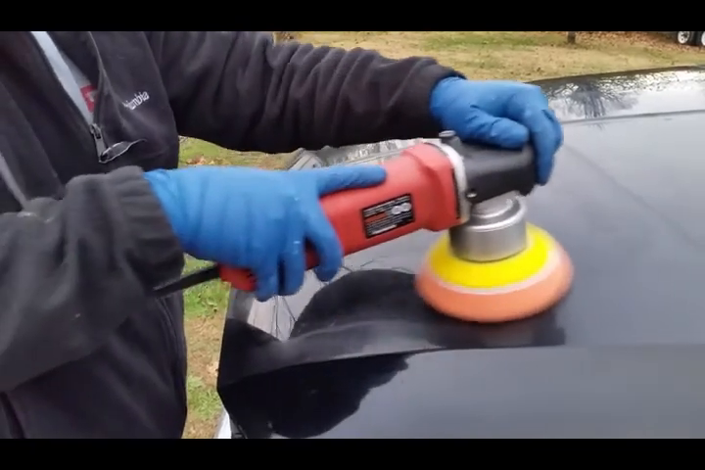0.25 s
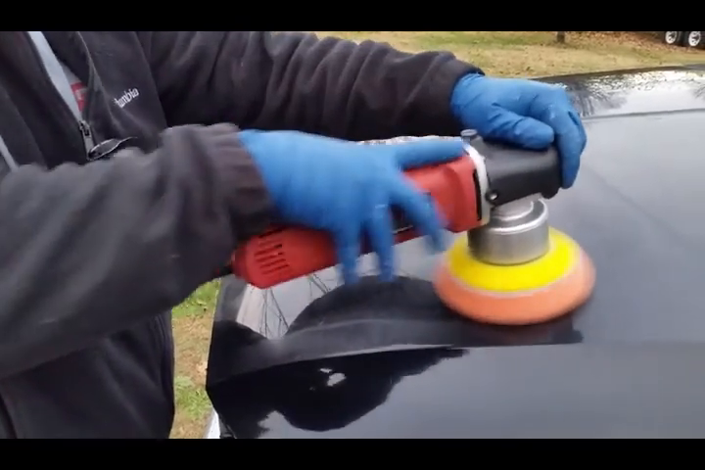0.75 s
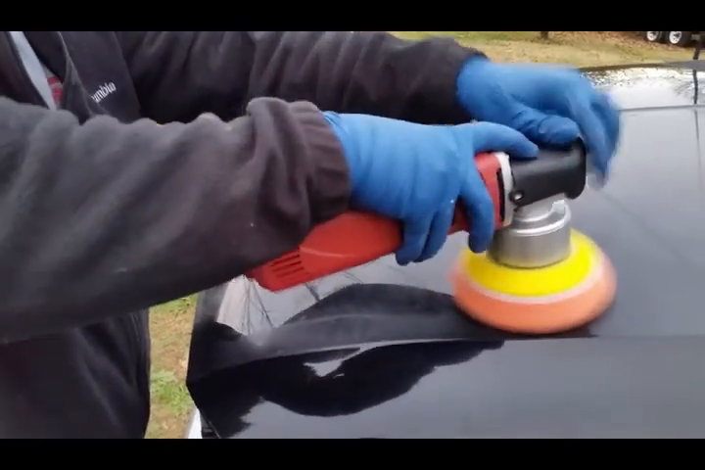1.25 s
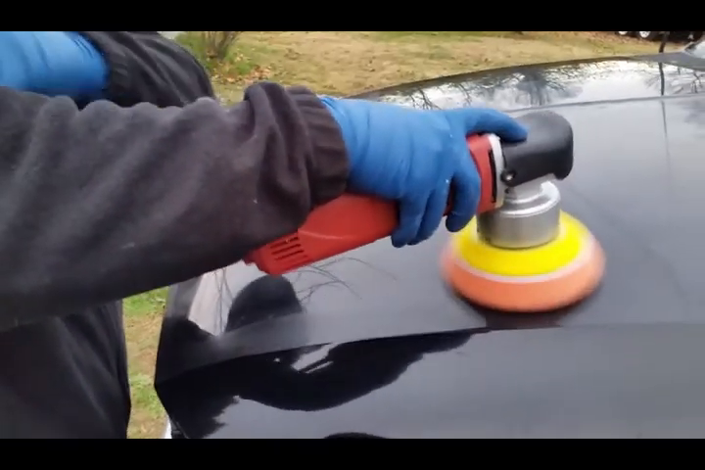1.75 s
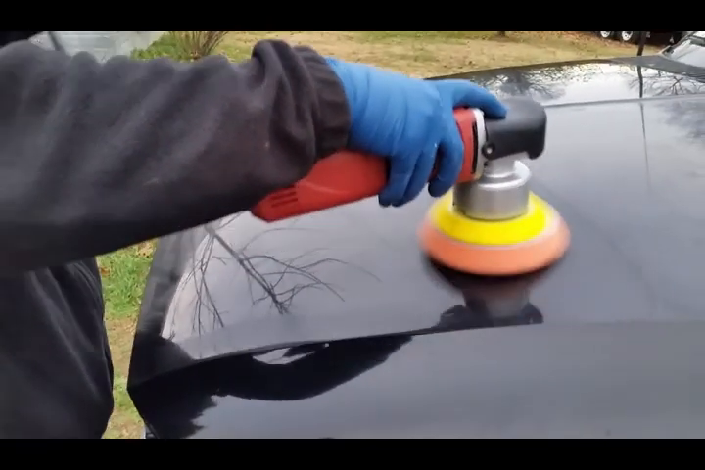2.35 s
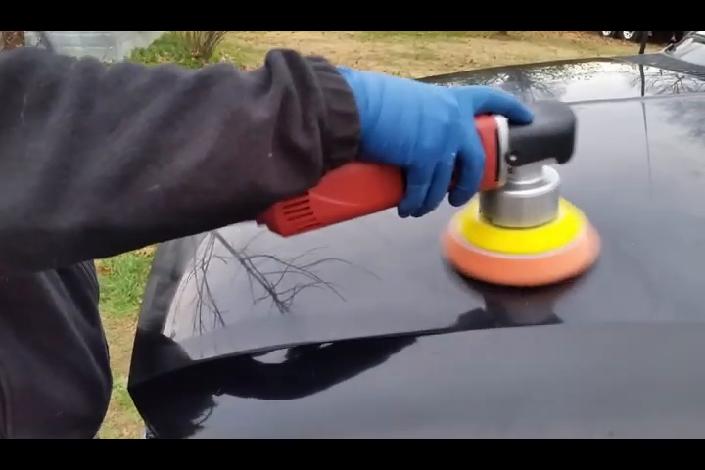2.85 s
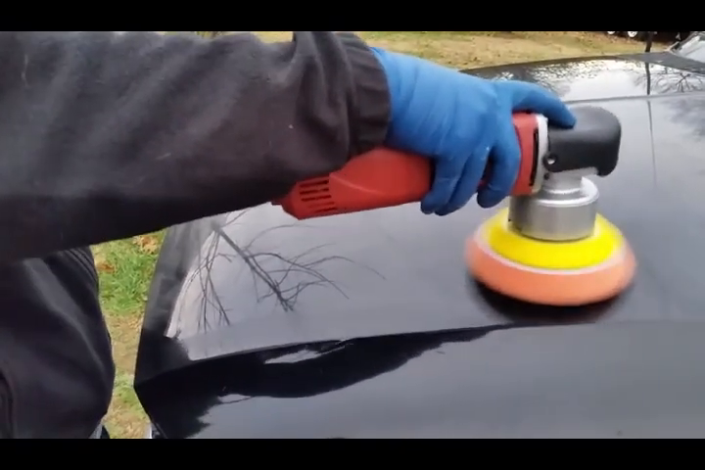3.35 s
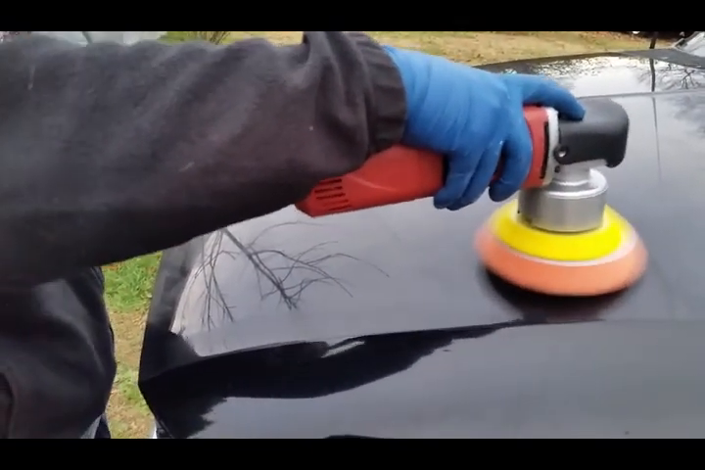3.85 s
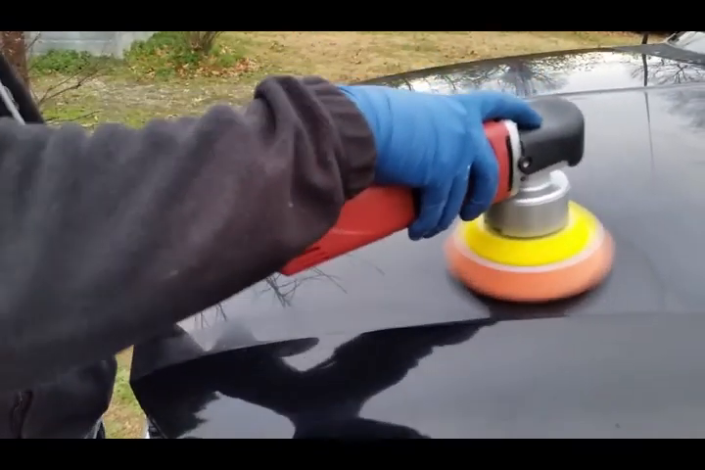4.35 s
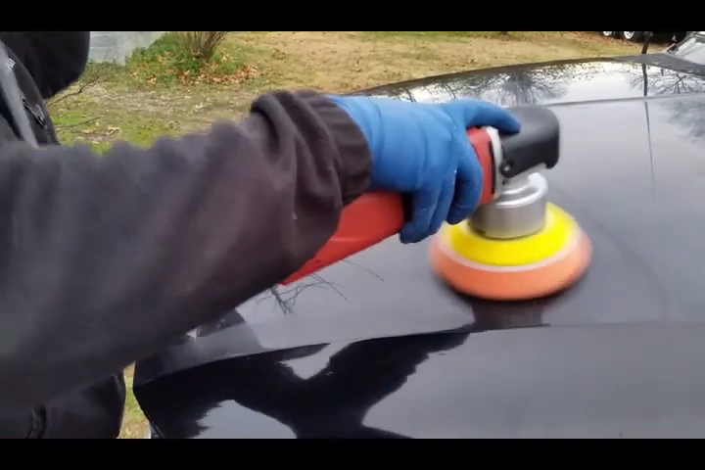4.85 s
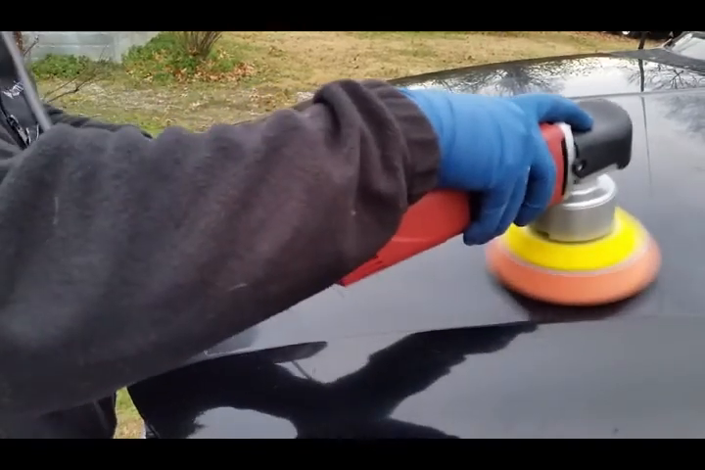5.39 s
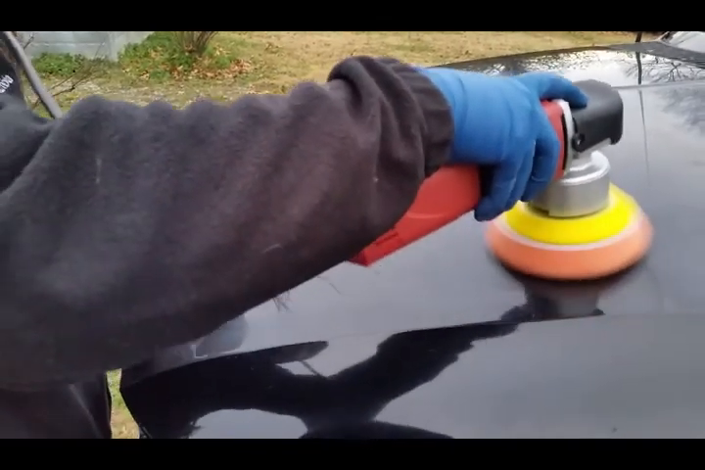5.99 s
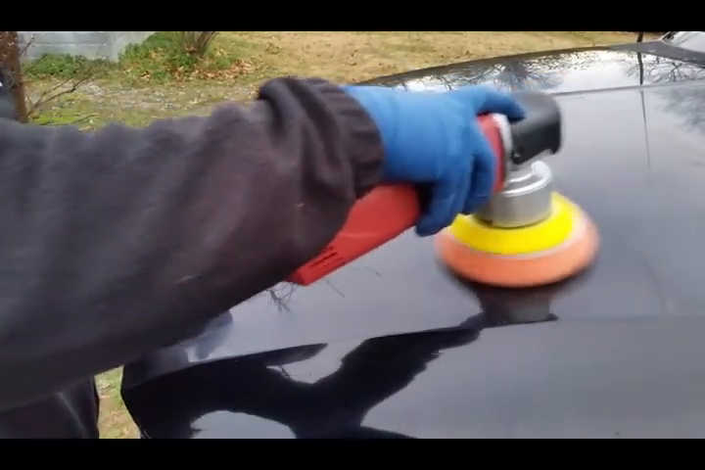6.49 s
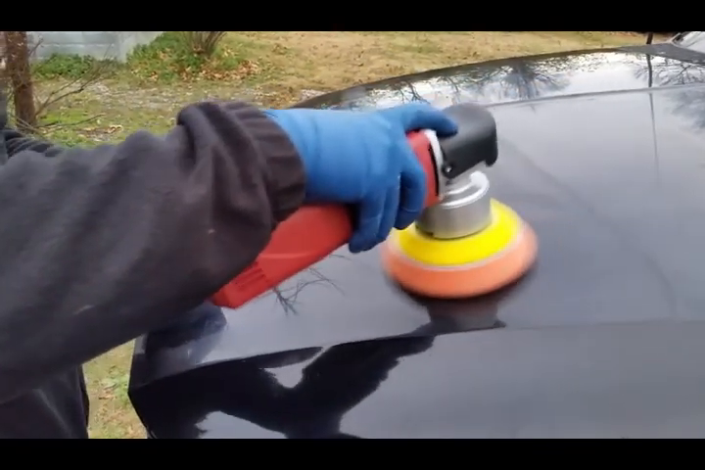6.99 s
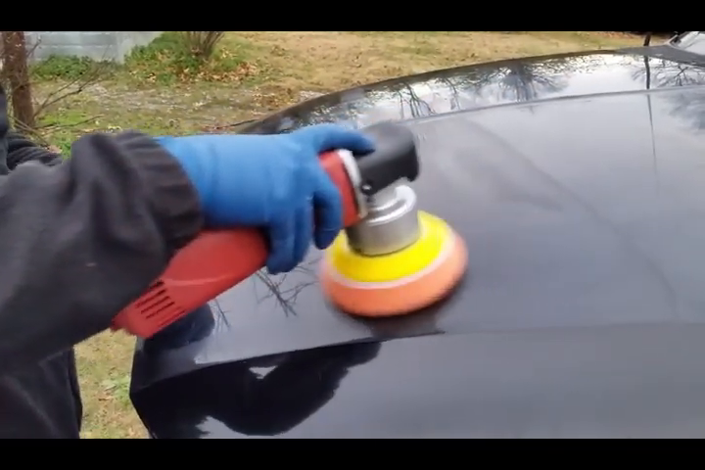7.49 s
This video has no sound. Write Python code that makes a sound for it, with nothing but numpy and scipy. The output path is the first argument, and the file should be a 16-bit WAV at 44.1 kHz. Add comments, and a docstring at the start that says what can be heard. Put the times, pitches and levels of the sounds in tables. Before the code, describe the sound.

Outdoors, very close in stereo, an electric orbital polisher runs without stopping on a car bonnet. A deep droning hum sits under a bright fan hiss, raspy gearbox and thin motor whine. The hum starts lighter, swells as the panel booms, eases, then wobbles quickly with a few short buzzing skips before settling into a clearer whine. Soft foam swishing runs throughout.

```python
"""Outdoors, close to a stereo microphone, a dual-action polisher runs on a car bonnet.
Forced vibration: the pad orbits about 92 times a second and drums on the panel; its slow free spin makes
the hum throb. The foam swishes on the paint, and later the pad's edge skips in short buzzes.
Gear meshing at 46:13 adds a whine and a rasp; the motor adds thin lines and the hiss of its cooling fan."""
import sys
import numpy as np
from scipy import signal
from scipy.fft import rfft, irfft, next_fast_len
from scipy.io import wavfile
from scipy.ndimage import uniform_filter1d, map_coordinates

SR = 44100
rng = np.random.default_rng(int(sys.argv[2]) if len(sys.argv) > 2 else 0)


def wav_out(sig):
    """Save sig, one row per channel (or a flat mono array), as 16-bit PCM at SR to the path in sys.argv[1]."""
    wavfile.write(sys.argv[1], SR, np.round(np.clip(np.atleast_2d(sig).T, -1, 1) * 32767).astype(np.int16))


N = 340893
PINION, RING = 13, 46  # gear teeth


def amp(db):
    """Logarithmic level: decibels to amplitude gain."""
    return 10 ** (np.asarray(db) / 20)


def unit(x):
    """Power normalisation: scale to rms 1."""
    return x / np.sqrt(np.mean(np.abs(x) ** 2) + 1e-20)


def swing(db):
    """Level fluctuation: a level curve about its own mean."""
    return db - db.mean()


def along(rows, hz):
    """Spectral interpolation: each column after the frequency, read on a log axis."""
    f, *cols = np.transpose(rows)
    return np.array([np.interp(np.log(hz + 1), np.log(f + 1), c) for c in cols])


def curves(rows):
    """Temporal interpolation: one value per sample for each column after the time."""
    s, *cols = np.transpose(rows)
    return [np.interp(np.arange(N) / SR, s, c) for c in cols]


def spells(rows, rise_s, fall_s):
    """Linear envelopes: (start, end, strength) rows, at half strength at start and end."""
    t = np.arange(N) / SR
    total = 0
    for start, end, strength in rows:
        ramp = np.minimum((t - start) / rise_s, (end - t) / fall_s) + .5
        total = total + strength * np.clip(ramp, 0, 1)
    return total


def wobble(rate):
    """Random modulation: a curve through normal random knots, rate knots a second."""
    knots = rng.standard_normal(int(N * rate / SR) + 4)
    coarse = np.arange(0, N + 32, 32)
    smooth = map_coordinates(knots, [coarse * rate / SR], mode="nearest")
    return np.interp(np.arange(N), coarse, smooth)


def angle(rate):
    """Phase as integrated frequency: running angle of something that turns rate times a second."""
    return 2 * np.pi * np.cumsum(rate) / SR


# stereo coherence of the noises: (frequency [Hz], left-right likeness [0-1], phase by which left leads [rad])
PORT_COHERENCE = [(30, 0.9, 2), (101, 0.56, 0.5), (317, 0.8, 1), (770, 0.71, 0), (1780, 0.58, -2.5),
                  (2810, 0.66, -1.5), (3370, 0.58, -4), (5860, 0.77, -4.5), (8700, 0.02, -7),
                  (14500, 0, -2.5)]


def rush(colour, patchy_db=0):
    """Partial coherence: coloured stereo noise, partly shared by the ports, with a mid channel of rms 1."""
    size = next_fast_len(N + 8192)
    hz = np.fft.rfftfreq(size, 1 / SR)
    alike, lead = along(PORT_COHERENCE, hz)
    alike = np.clip(alike, 0, 1)
    a, b = rfft(rng.standard_normal((2, size)))
    right = alike * np.exp(-1j * lead) * a + np.sqrt(1 - alike ** 2) * b
    pair = np.array([a, right]) * amp(along(colour, hz))
    pair = irfft(pair, size)[:, :N]
    if patchy_db:  # narrow bands slowly come and go
        z = signal.stft(pair, nperseg=1024)[2]
        field = uniform_filter1d(rng.standard_normal(z.shape), size=6, axis=1)
        field = uniform_filter1d(field, size=20, axis=2)
        pair = signal.istft(z * amp(patchy_db * unit(field)), nperseg=1024)[1][:, :N]
    return pair / np.std(pair.mean(axis=0))


# mean orbital speed of the pad: (time [s], orbit rate [Hz])
ORBIT_RATE = [(0, 90.3), (1.35, 90.8), (1.85, 92.2), (3.85, 92.8), (4.93, 94.7), (5.7, 92.77), (6.2, 91.48),
              (7.73, 91.25)]
# free rotation of the pad: (time [s], spin rate [Hz], rocking [0-1])
PAD_SPIN = [(0, 9.26, 0.26), (.6, 9.9, 0.1), (2, 9.7, 0), (2.6, 9.5, 0), (2.85, 9.4, .2), (3.15, 9.5, 0),
            (3.9, 9.8, 0), (4.4, 12.2, 0.32), (5.05, 11, 0.2), (5.3, 10.2, 0.6), (5.7, 9.49, 0.73),
            (6.15, 8.93, 0.64), (6.6, 9.16, 0.68), (6.85, 8.85, 0.2), (7.1, 8.9, 0.1), (7.73, 12, 0.5)]


def motion(press_s=5.72):
    """Compound rotation: angles of orbit and spin (low edge presses at press_s), and rocking of the pad."""
    speed, = curves(ORBIT_RATE)
    spin_rate, rocking = curves(PAD_SPIN)
    spin = angle(spin_rate)
    spin -= np.interp(press_s, np.arange(N) / SR, spin)
    orbit = angle(speed * (1 + 0.000457 * wobble(14)))
    return orbit, spin, rocking


# the pad leans on its edge: (start [s], end [s], strength [0-1])
EDGE_LEANS = [(5.12, 6.43, 0.13), (5.86, 6.43, 0.59)]


def edge_leaning():
    """Contact pressure: how strongly the pad leans on its edge."""
    return spells(EDGE_LEANS, rise_s=0.3, fall_s=0.052)


# the pad crosses a springy stretch and the panel booms:
# (start [s], end [s], lift [dB], centre frequency [Hz], width [octaves])
PANEL_BOOMS = [(0, 0.39, 12, 365, 0.22), (1.503, 2.284, 4, 367, 0.13), (2.277, 2.61, 6, 273, 0.16),
               (2.3, 2.723, 11, 530, 1.8), (2.665, 3.097, 12.5, 275, 0.15), (3.118, 4.126, 9.5, 475.4, 1.6),
               (3.37, 4.233, 7, 289, 0.42), (4.13, 4.453, 5.5, 366, 0.15), (5.1, 5.8, 2.5, 370, 0.17),
               (6.95, 7.49, 10.5, 275, 0.28)]


def booming(hz):
    """Panel resonance: decibels by which the springy stretches lift a line at hz."""
    lifts = []
    for start, end, db, centre, width in PANEL_BOOMS:
        octaves = np.log2(hz / centre)
        lifts.append((start, end, db * np.exp(-(octaves / width) ** 2)))
    return spells(lifts, rise_s=0.25, fall_s=0.24)


# level difference of the hum at the two ports: (frequency [Hz], left minus right [dB])
HUM_BALANCE = [(92, 3.5), (185, 5.5), (277, 8), (370, 8.5), (460, 9.5), (800, 4)]


def at_ports(line, order):
    """Interaural-type level difference: a line of the hum as the two ports hear it."""
    ratio = amp(along(HUM_BALANCE, order * 92)[0])  # nominal 92 Hz orbit
    return np.outer([ratio, 1], line) * 2 / (1 + ratio)


def harmonic(order, orbit, spin, rocking, swell, bend, lag, rough, flutter):
    """Amplitude and phase modulation: each turn of the rocking pad swells a line and bends its phase."""
    turn = spin - lag + .3 * wobble(9)
    rocking = rocking * amp(2 * wobble(11))
    bent_turn = turn + np.pi / 9 + 0.28 * wobble(5)
    throb = np.exp(rocking * (swell * np.cos(turn) + 1j * bend * np.cos(bent_turn)))
    throb += flutter * rocking * np.exp(-2j * turn)  # the pad is not quite round: flutter twice a turn
    power = uniform_filter1d(np.abs(throb) ** 2, SR // 5)
    throb /= np.sqrt(np.abs(power))  # evens the level over a fifth of a second
    grip = unit(1 + rough * (wobble(35) + 1j * wobble(35)))  # the foam grips unevenly
    stray = 0.6 * (order - 1) * wobble(1.489)  # slow phase drift, wider for higher lines
    line = -np.sqrt(2) * np.real(throb * grip * np.exp(1j * (order * orbit + stray)))
    return at_ports(line, order)


# how hard the pad drives the bonnet:
# (time [s], sway of the whole panel [dB], reference drumming under the pad [dB])
PANEL_DRIVE = [(0, -26, -38), (.4, -25, -31.5), (.9, -24.5, -28), (1.45, -20.5, -23.5), (2.25, -20, -21),
               (2.6, -21.5, -22.5), (2.82, -20.5, -25), (3.15, -21, -21), (3.9, -20, -23),
               (4.7, -18.5, -26), (5.05, -19, -25.5), (5.65, -19.5, -21), (6.1, -22, -21),
               (6.8, -19, -26.5), (7.25, -19, -22.5), (7.48, -23, -31.5), (7.73, -23, -36)]
# harmonics 2-5 in order: (level against mean drumming [dB], growth with drumming [dB/dB],
# added at full rocking [dB], added at full leaning [dB])
HUM_HARMONICS = [(2.06, 1.0, -1.5, -5), (-17.5, 0.66, 14, 15.5), (-16.5, 1.04, 4.5, 2.5),
                 (-23.5, 1.3, -4, 13)]
# weak upper harmonics, before a common 1.3 dB cut: (multiple of the orbit [1], level against the fifth [dB])
HUM_OVERTONES = [(6, -14), (7, -19), (8, -17), (9, -20)]
BOOM_LAG = 0.35  # a booming panel answers late [rad per dB of lift]


def hum(orbit, spin, rocking, leaning):
    """Forced vibration: the orbiting pad drums on the bonnet in harmonics of its orbit."""
    sway, drumming = curves(PANEL_DRIVE)
    pitch = curves(ORBIT_RATE)[0].mean()
    levels = []
    for order, (db, growth, rock_db, lean_db) in enumerate(HUM_HARMONICS, 2):
        level = drumming.mean() + db + growth * swing(drumming)
        level = level + rock_db * rocking + lean_db * leaning
        levels.append(level + booming(order * pitch))
    second, third, fourth, fifth = [amp(level) for level in levels]

    def line(order, rock, **shape):
        """Resonant phase lag: a harmonic delayed by the booming panel."""
        late = orbit - BOOM_LAG * booming(order * pitch) / order
        return harmonic(order, late, spin, rock, **shape)

    out = amp(sway) * harmonic(1, orbit, spin, rocking, swell=0.15, bend=0.074, lag=2.7, rough=0.061, flutter=0.024)
    out += second * line(2, rocking, swell=.85, bend=1.25, lag=.06, rough=.1, flutter=.4)
    loose = 0.19 + 0.15 * rocking  # modulation depth of the third and above
    out += third * line(3, loose, swell=.9, bend=.6, lag=1.6, rough=.12, flutter=.3)
    out += fourth * line(4, loose, swell=.65, bend=.85, lag=.55, rough=.1, flutter=.35)
    out += fifth * line(5, loose, swell=.65, bend=1.0, lag=.55, rough=.2, flutter=.22)
    for order, db in HUM_OVERTONES:
        out += fifth * amp(db - 1.3) * line(order, loose, swell=1.1, bend=.9, lag=.2, rough=.5, flutter=.3)
    return out


# side tones before the unevenness is added:
# (multiple of the orbit [1], turns of the pad added [1], level [dB])
SIDEBANDS = [(2, -3, -48), (2, -2, -38), (2, -1, -39), (2, 1, -39), (3, -4, -51), (3, -3, -49),
             (3, -2, -39), (3, 1, -37.5), (3, 2, -48), (4, -3, -52), (4, -2, -46), (4, 1, -44), (5, 1, -53)]
# how unevenly the pad lies:
# (time [s], change of the second harmonic's side tones [dB], change of the higher ones' [dB])
UNEVENNESS = [(0, -9, -7), (.9, -7, 0), (1.4, -4, 0), (1.9, 3, -1), (2.5, -2, -5), (3.3, -4, -12),
              (4.1, -1, -4), (4.8, 0, -1), (5.4, 0, -1), (6.2, 4, 3), (6.6, 0, 1.5), (7.25, 0, 4),
              (7.73, -5, -3.5)]
# nasal tone one pad turn above the seventh harmonic, mean level: (time [s], level [dB])
NASAL_TONE = [(0, -62), (1.3, -58), (1.7, -50), (3, -51), (3.7, -52), (4.5, -48.5), (5.6, -49), (7, -51),
              (7.73, -58)]


def warble(orbit, spin):
    """Sidebands: the uneven pad splits harmonics into drifting side tones, whole pad turns apart."""
    second_db, higher_db = curves(UNEVENNESS)
    out = np.zeros((2, N))
    for order, turns, db in SIDEBANDS:
        uneven_db = second_db if order == 2 else higher_db
        level = amp(db + uneven_db) * unit(amp(1.6 * wobble(4)))
        phase = order * orbit + turns * spin + rng.uniform(0, 2 * np.pi) + .55 * wobble(3)
        out += at_ports(level * np.sqrt(2) * np.cos(phase), order)
    nasal_level = amp(curves(NASAL_TONE)[0] + 1.5 * wobble(9))
    nasal = nasal_level * np.sqrt(2) * np.cos(7 * orbit + spin + .4 * wobble(9))
    return out + at_ports(nasal, order=7)


# relative spectrum of the foam on the paint: (frequency [Hz], left [dB], right [dB])
FOAM_COLOUR = [(200, -25, -38), (440, 1, -21), (620, -9.5, -8), (752, 1, -4), (1040, -3.5, -17),
               (1560, -8.5, -10), (1900, -8.5, -5), (2300, -13, -11.5), (3210, -12, -12.5),
               (5000, -42, -44)]
# relative spectrum of the rumbling panel: (frequency [Hz], left [dB], right [dB])
RUMBLE_COLOUR = [(20, -11, -19), (45, -13, -16), (59.7, 1, -8), (133, -6.5, -13.5), (187, 6.5, 4),
                 (224, -5, -6), (250, 2, -2), (305, -3, -13), (365, -3.5, -8), (422, -6.5, -15),
                 (546, -44, -22), (1200, -65, -41)]


def foam(orbit, spin, rocking):
    """Friction noise: foam swishes on the paint, faintly pulsed each orbit, and makes the panel rumble."""
    sway_db = 0.6 * swing(curves(PANEL_DRIVE)[0])
    rub_db = sway_db - 0.5 * rocking
    stroke = unit((1 + 0.022 * np.cos(orbit)) * (1 + 0.079 * rocking * np.cos(spin)))
    swish = amp(rub_db - 38.5 + 1.54 * wobble(17)) * stroke * rush(FOAM_COLOUR, patchy_db=1.64)
    drag = amp(1.2 * wobble(9)) * (1 + .4 * rocking * np.cos(spin))
    rumble = amp(rub_db - 34.0) * drag * rush(RUMBLE_COLOUR)
    return swish + rumble


# the hands cover and uncover the machine, before trims of -3.5 dB for fan and -2 dB for rasp:
# (time [s], fan hiss [dB], gearbox rasp [dB])
HAND_EXPOSURE = [(0, -24, -37), (.6, -24, -36), (1.35, -22, -31.5), (2.2, -23.5, -35), (2.52, -27.5, -39),
                 (2.85, -25, -36.5), (3.4, -26.5, -35), (4, -25, -33.5), (4.35, -22, -32.5),
                 (4.95, -22, -32.5), (5.65, -22.5, -30), (6.95, -22.5, -34), (7.3, -21, -30.5),
                 (7.73, -22.5, -33)]
# the gear head turns towards the microphone: (time [s], low housing resonance [dB])
HOUSING_LEVEL = [(0, -48), (1.3, -50), (2.8, -50), (3.5, -65), (5.1, -63), (6.2, -60), (7.25, -46.5),
                 (7.55, -38.5), (7.73, -38.5)]
# relative spectrum of the gearbox rasp: (frequency [Hz], left [dB], right [dB])
RASP_COLOUR = [(1400, -4.5, -9), (2560, -9, -9), (3270, -4, -2.5), (3570, -0.5, -5), (3980, -3.5, 3.5),
               (4160, -1, 0.5), (4620, -8.5, -0.5), (5570, -2.5, -19), (5920, -1, -6.5), (6440, -19, -2.5),
               (7000, -48, -34), (9000, -36, -42)]
# relative spectrum of the low housing resonance: (frequency [Hz], left [dB], right [dB])
LOW_RESONANCE = [(1400, -35, -35), (1920, -13, -13), (2020, 0, 0), (2120, -14, -14), (2900, -17, -17),
                 (3400, -35, -35)]
# relative spectrum of the high housing resonance: (frequency [Hz], left [dB], right [dB])
HIGH_RESONANCE = [(4160, -37, -28), (4880, 3, -4.5), (5210, 7.5, 10), (5940, -4.5, 1.5), (6800, -43, -44)]
# each gear tone beams its own way as the head turns, before port balance and a 0.3 dB cut:
# (time [s], mesh tone [dB], one motor turn below [dB], two below [dB])
MESH_LEVELS = [(0, -46, -50, -50), (.7, -49, -54, -47), (1.2, -53, -48, -45), (1.7, -51, -45, -49),
               (2.7, -50, -49, -60), (3.4, -54, -52, -62), (4, -49, -48, -56), (4.9, -51, -43, -53),
               (5.4, -46, -47, -52), (6.3, -39, -50, -42), (7.2, -38, -40, -48), (7.73, -40, -43, -50)]
# port balance of the mesh tone and, as the pinion runs off centre, of the tones one and two motor turns
# below, in order: (left [dB], right [dB])
MESH_BALANCE = [(-1.5, 1.5), (-2.5, 2), (2.5, -3)]


def gears(orbit):
    """Gear meshing: teeth sing at their mesh rate and rasp in the housing under a pulsing load."""
    _, rasp_db = curves(HAND_EXPOSURE)
    low_db, = curves(HOUSING_LEVEL)
    high_db = -42.5 + 1.6 * swing(rasp_db)
    shaft = orbit * RING / PINION
    load = unit(1 + .2 * np.cos(orbit) + .07 * np.cos(shaft) + .08 * np.cos(2 * shaft))
    rasp = amp(rasp_db - 2.0) * rush(RASP_COLOUR, patchy_db=1.93)
    rasp += amp(low_db) * rush(LOW_RESONANCE)
    rasp += amp(high_db) * rush(HIGH_RESONANCE)
    teeth = RING * orbit + 0.28 * wobble(30)
    mesh = np.zeros((2, N))
    for below, (tone_db, (left_db, right_db)) in enumerate(zip(curves(MESH_LEVELS), MESH_BALANCE)):
        phase = teeth - below * shaft
        level = amp(tone_db - .3 + 1.9 * wobble(14))
        tone = np.sqrt(2) * np.cos([phase, phase + 0.88])
        mesh += amp([[left_db], [right_db]]) * level * tone
    return amp(1.28 * wobble(30)) * load * rasp + mesh


def peaked(x, centre_hz, width_hz, lift_db):
    """Moving formant: lift a band whose centre moves, keeping the overall level."""
    hz, s, z = signal.stft(x, SR, nperseg=512)
    centre = np.interp(s, np.arange(N) / SR, centre_hz)
    band = np.exp(-((hz[:, None] - centre) / width_hz) ** 2)
    out = signal.istft(z * amp(lift_db * band), nperseg=512)[1][:, :N]
    return unit(out) * np.std(x)


# relative spectrum of the low vent hiss: (frequency [Hz], left [dB], right [dB])
VENT_COLOUR = [(6150, -8.5, -11), (7700, -30, -38), (7930, -20, 1.5), (8220, -1, -4.5), (8610, 0.5, 6),
               (9540, -14, 4), (10600, 8, -0.5), (11700, 7, -5), (12800, 9, 0), (13800, -17, -8.5)]
# relative spectrum of the fan hiss before its moving peak: (frequency [Hz], left [dB], right [dB])
FAN_COLOUR = [(10500, -38, -13.5), (11200, -11, -24), (12000, 6, -15), (12800, 3.5, -12), (14000, 5, -8.5),
              (14550, 3, -7), (15200, 1, -5)]
# the fan's hiss is brightest where the vents point: (time [s], centre frequency [Hz])
FAN_PEAK_PATH = [(0, 12400), (.55, 12200), (.8, 13500), (2.2, 13600), (2.6, 13200), (4, 13500),
                 (5.8, 13200), (7.2, 12800), (7.73, 12200)]
# relative levels of the motor lines: (multiple of the motor's turn [1], left [dB], right [dB])
MOTOR_LINES = [(2, -9, -11), (26, -6, -1), (27, -11, -5), (28, -12, -4), (29, -15, -8), (32, -6, -8),
               (33, 0, -5), (34, -4, -7), (36, -4, -12), (37, 0, -11), (38, 1, -11), (39, 1, -12),
               (40, -1, -11), (41, -1, -11)]
# a motor line beams at the microphone for a moment:
# (start [s], end [s], multiple of the motor's turn [1], lift [dB])
MOTOR_FLARES = [(-.1, .4, 39, 11), (-.1, .75, 40, 11), (1.4, 4.8, 27, 7), (2.3, 3.9, 33, 10),
                (4.25, 4.55, 39, 15), (4.85, 5.25, 39, 11), (5, 5.7, 34, 8), (5.67, 6.3, 39, 12),
                (6.55, 7.8, 38, 7), (6.6, 7.8, 28, 7), (6.95, 7.35, 41, 10), (7.3, 7.8, 39, 8)]


def motor(orbit):
    """Aerodynamic noise and rotational tones: vents hiss; armature and fan sing, beside a faint whistle."""
    fan_db, _ = curves(HAND_EXPOSURE)
    vent_db = -31 + swing(fan_db)
    singing_db = -46.5 + 1.5 * swing(fan_db)
    shaft = orbit * RING / PINION
    chop = unit(1 + 0.021 * np.cos(orbit) + 0.038 * np.cos(shaft) + 0.07 * np.cos(2 * shaft))
    vents = rush(VENT_COLOUR, patchy_db=1)
    fan = rush(FAN_COLOUR, patchy_db=1.4)
    fan = peaked(fan, curves(FAN_PEAK_PATH)[0], width_hz=1100, lift_db=6.5)
    air = amp(vent_db) * vents + amp(fan_db - 3.5) * fan
    whine = np.zeros((2, N))
    for order, left_db, right_db in MOTOR_LINES:
        phase = order * shaft + 0.37 * wobble(25)
        line = np.sqrt(2) * np.cos([phase, phase + rng.uniform(0, np.pi)])
        flares = [(start, end, db) for start, end, multiple, db in MOTOR_FLARES if multiple == order]
        flare_db = spells(flares, rise_s=.1, fall_s=.1)
        flicker = unit(amp(2.2 * wobble(6)))
        whine += amp([[left_db], [right_db]]) * amp(flare_db) * flicker * line
    whistle = amp(-51) * np.cos(angle(4624 + 6 * wobble(20)))  # nearly steady pitch
    return amp(0.6 * wobble(25)) * chop * air + amp(singing_db) * whine + whistle


# relative levels of the lines a skip buzzes with: (multiple of the orbit [1], level [dB])
BUZZ_LINES = [(4, -31), (5, -31), (6, -38), (7, -39)]
# relative spectrum of the scuffing foam: (frequency [Hz], left [dB], right [dB])
SCUFF_COLOUR = [(110, -10, -20), (153, 18, 5), (225, 1, -8), (330, 13, -6), (420, 0, -11), (583, 2, -2),
                (700, -5, -8), (1100, -20, -16), (2000, -48, -50)]
# the leaning edge skips on the paint: (middle [s], length [s], gain of the buzz lines [dB], scuffing noise [dB])
EDGE_SKIPS = [(5.342, 0.027, -8, -32), (5.54, 0.036, -7, -44), (5.741, 0.057, -4, -27),
              (5.96, 0.057, -4, -25.5), (6.074, 0.052, -6, -29), (6.183, 0.072, -2.5, -31),
              (6.301, 0.064, -0.5, -29), (6.408, 0.065, -4, -28)]


def skips(orbit, spin):
    """Stick-slip: the edge catches the paint; for a few orbits the panel buzzes, a little sharp, and foam scuffs."""
    buzz = np.zeros((2, N))
    for order, db in BUZZ_LINES:
        phase = order * orbit + spin + .8 * wobble(20)  # one pad turn above the harmonic
        line = amp(db + 1.5 * wobble(25)) * np.sqrt(2) * np.cos(phase)
        buzz += at_ports(line, order)
    scuff = unit(1 + 0.37 * np.cos(orbit)) * rush(SCUFF_COLOUR)
    out = np.zeros((2, N))
    for s, length, buzz_db, scuff_db in EDGE_SKIPS:
        caught = spells([(s - length / 2, s + length / 2, 1)], rise_s=.012, fall_s=.022)
        out += caught * (amp(buzz_db) * buzz + amp(scuff_db) * scuff)
    return out


def scene():
    """Superposition: pad, gears and motor sound together, timed by one orbit angle."""
    orbit, spin, rocking = motion()
    pad = hum(orbit, spin, rocking, edge_leaning())
    pad += warble(orbit, spin)
    pad += foam(orbit, spin, rocking)
    pad += skips(orbit, spin)
    return pad + gears(orbit) + motor(orbit)


def record(dry):
    """Peak limiting and band limiting: the highest peaks are gently rounded, and the recorder cuts everything
    above 14560 Hz."""
    rounded = dry / (1 + np.abs(dry / .92) ** 8) ** (1 / 8)
    size = next_fast_len(N + 8192)
    kept = np.fft.rfftfreq(size, 1 / SR) < 14560
    return irfft(rfft(rounded, size) * kept, size)[:, :N]


dry = scene()
out = record(dry)
wav_out(out)
```